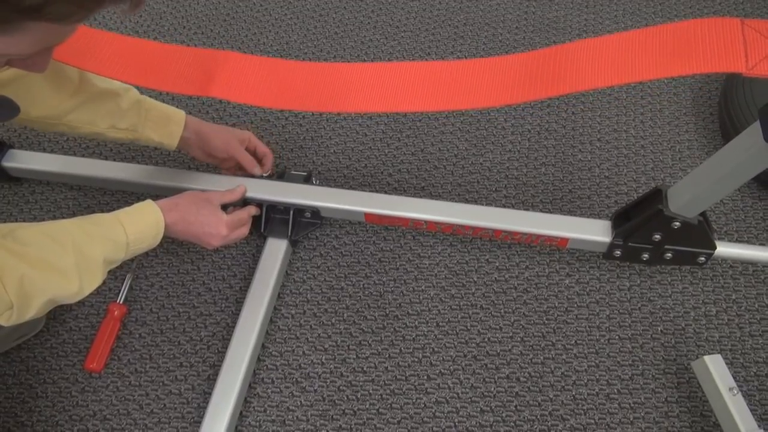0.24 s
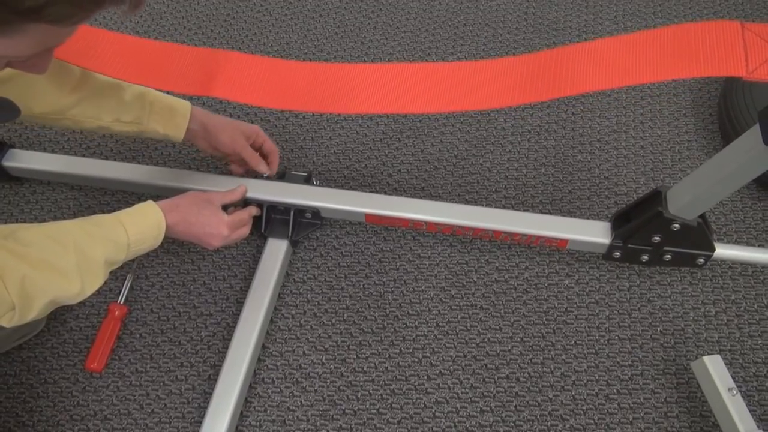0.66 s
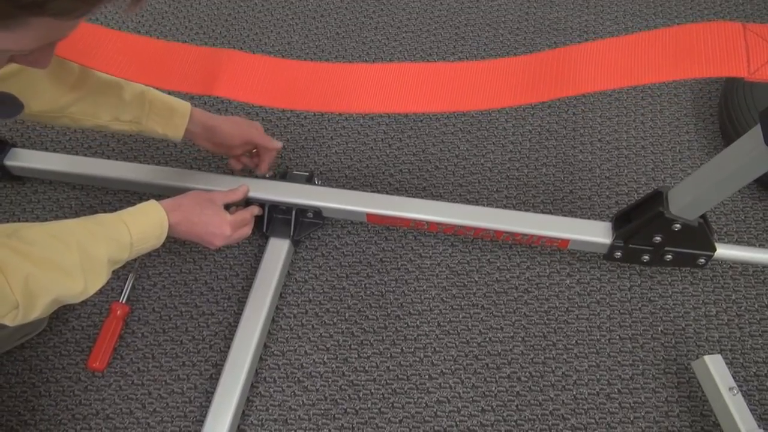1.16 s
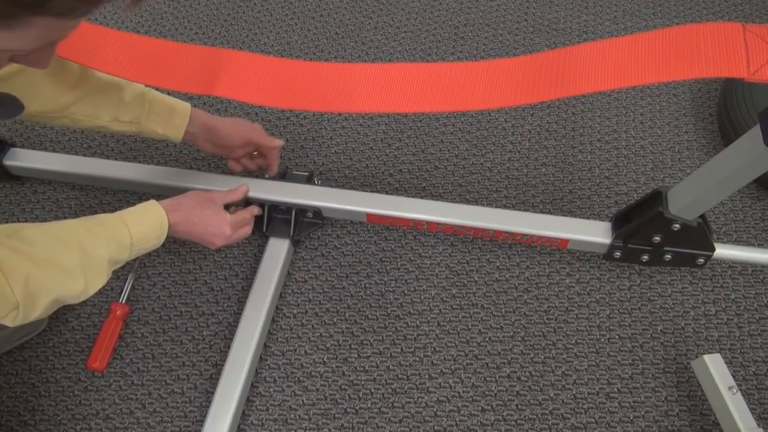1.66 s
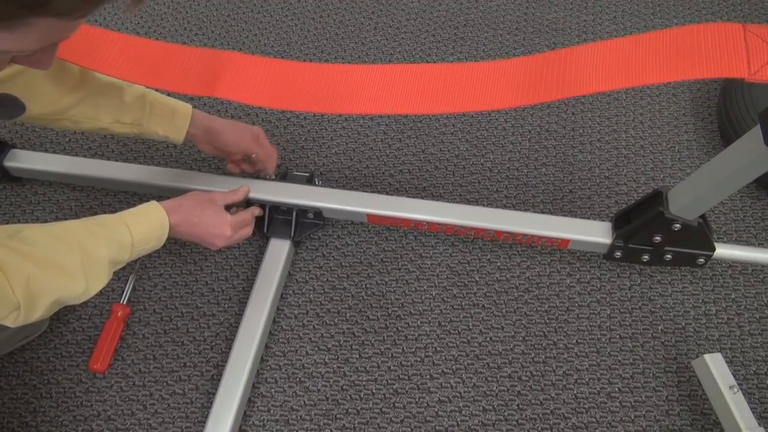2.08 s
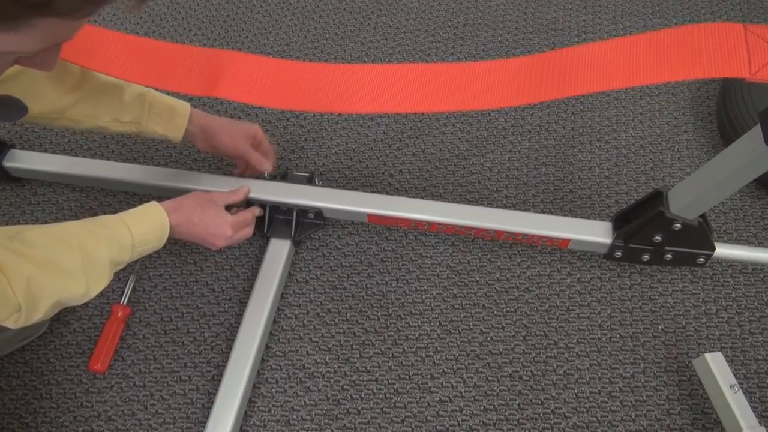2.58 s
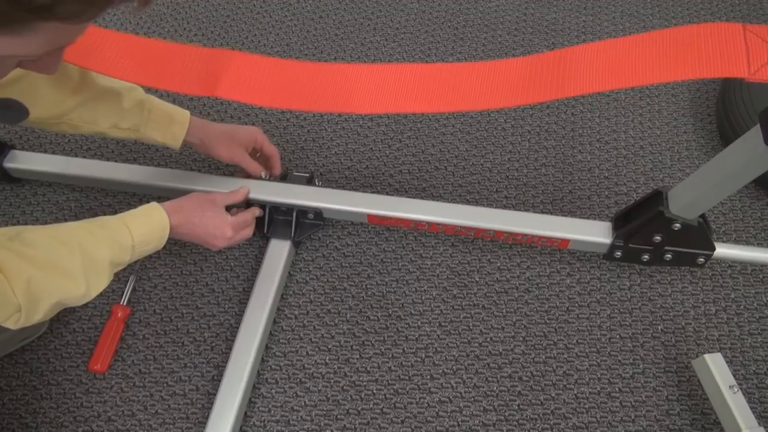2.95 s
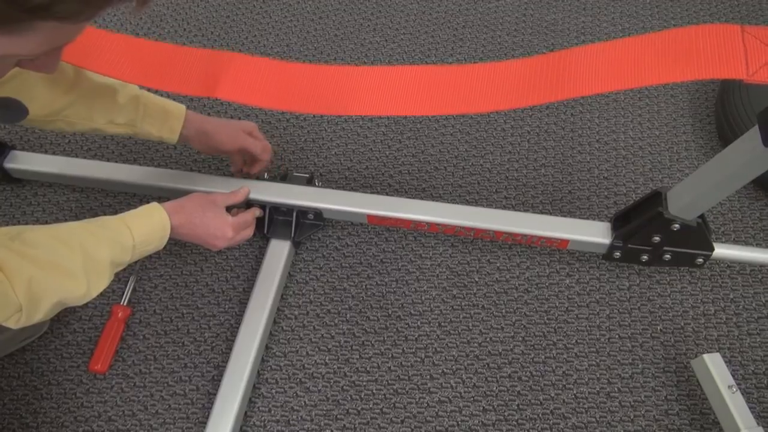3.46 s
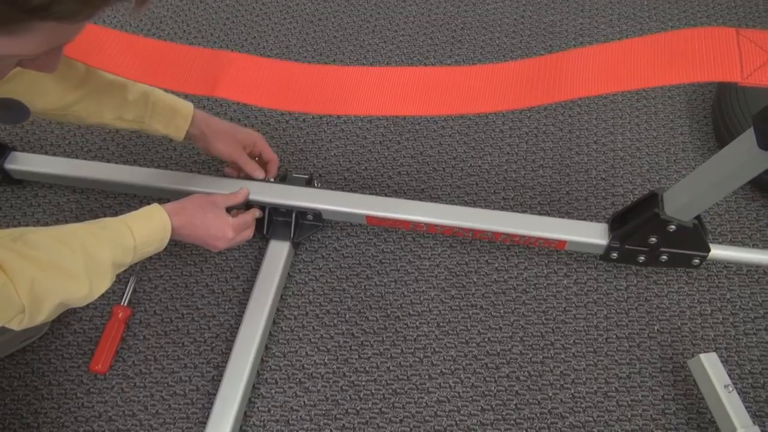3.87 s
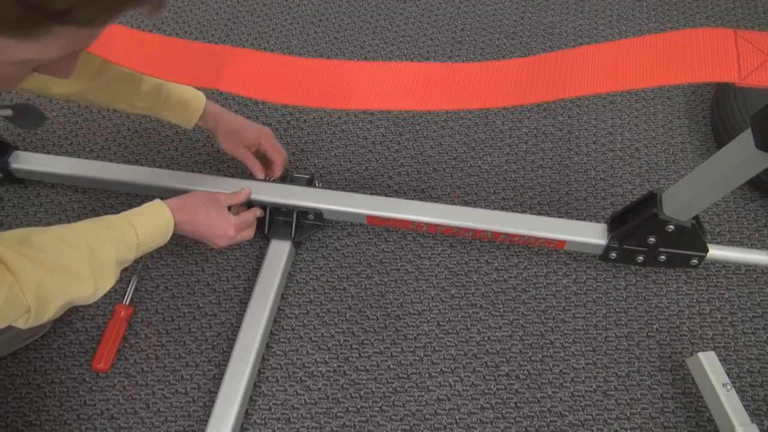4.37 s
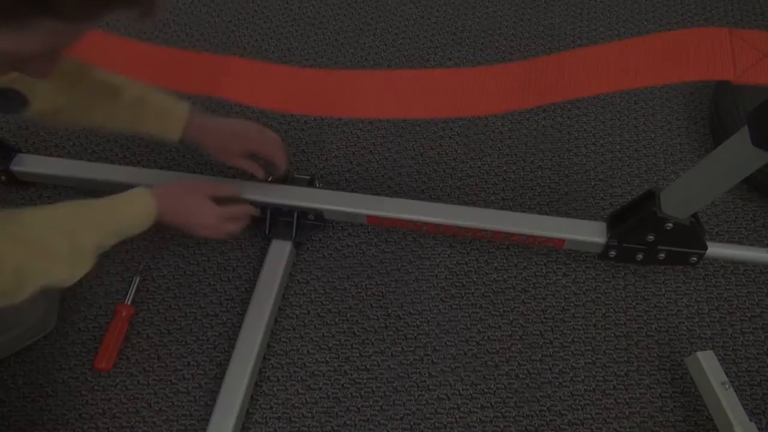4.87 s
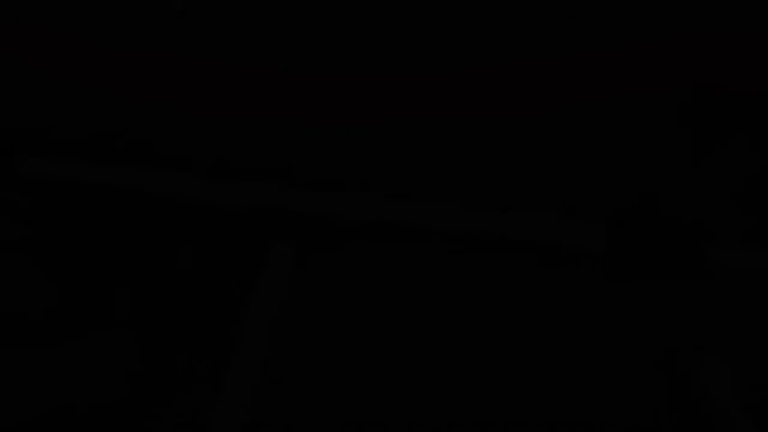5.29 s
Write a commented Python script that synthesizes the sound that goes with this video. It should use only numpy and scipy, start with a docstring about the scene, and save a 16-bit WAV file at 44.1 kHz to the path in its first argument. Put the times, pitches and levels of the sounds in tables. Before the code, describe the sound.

Small hardware rattles and rasps on a hollow metal tube in a quiet carpeted room, thinning to soft thuds and cloth brushing before a fade-out.

```python
"""Room tone and mains hum lie under a bolt wiggled through a bracket on an aluminium tube frame, and a wing nut turned on it.
From the first moments each contact is a brief chatter of metal: the harder, the brighter; the looser the fingers,
the more washer, nut and bolt clink. The thread scrapes in between, as random slips through the metal's resonances.
After 3.5 s the contacts thin out and sleeves brush as the hands leave; soft thuds run from 3 s on.
The last moments fade out. Both channels carry the same sound, with a short diffuse answer from the carpeted room."""
import sys
import numpy as np
from scipy import signal
from scipy.fft import rfft, irfft, next_fast_len
from scipy.io import wavfile
from scipy.ndimage import map_coordinates

SR = 44100
rng = np.random.default_rng(int(sys.argv[2]) if len(sys.argv) > 2 else 0)


def wrap_up_sound(samples):
    """Save the sound to the file named by the first command line argument, as 16-bit audio."""
    columns = np.atleast_2d(samples).T
    # keep every value between -1 and 1, then stretch to whole-number steps
    tamed = np.clip(columns, -1, 1)
    steps = np.round(tamed * 32767).astype(np.int16)
    wavfile.write(sys.argv[1], SR, steps)


N = 244314
TIME = np.arange(N) / SR  # seconds
HIT_SIZE = 4096  # samples in one burst of chatter
TOP_HZ = 16100  # nothing sounds above this

# Room tone. Each row: frequency in Hz, relative level in dB.
AIR = [(15, -5.5), (35, 2), (50, 3.5), (75, 6), (140, 1.5), (200, 3.5), (280, 0), (480, 1), (750, -4.5),
       (1700, -10.5), (5850, -16.5), (12400, -18.5), (16000, -26)]
# Mains and a fan. Each row: frequency in Hz, rms level in dB.
HUM = [(60, -53.5), (120, -67), (177, -59.5), (479, -65.5)]
# Reverberation of the room. Each row: frequency in Hz, time to fall 60 dB in seconds.
ROOM_DECAY = [(200, .35), (1000, .42), (3000, 0.38), (6000, 0.25), (13000, 0.33)]

# Cloth rubbing as the sleeves move. Each row: time in seconds, rms level in dB.
SLEEVE = [(3.5, -84), (3.754, -66), (4.314, -55), (4.488, -51), (4.71, -61.5), (5.034, -49.5), (5.214, -57),
          (5.4, -50)]
# Colour of the cloth. Each row: frequency in Hz, relative level in dB.
CLOTH = [(710, -30), (1200, 3.5), (1430, -5), (1770, 0), (4600, -1.5), (8350, -4), (10100, 1.5),
         (16000, -6.5)]
# Soft thuds of hands and knees. Each row: start in seconds, level in dB.
THUDS = [(3.021, -50), (3.438, -39), (3.974, -48), (5.24, -45.5), (5.281, -43.5), (5.306, -42)]
# Colour of a thud. Each row: frequency in Hz, relative level in dB.
THUD_COLOUR = [(150, -19), (300, -7), (420, 1.5), (600, 0.5), (900, -5.5), (1400, -14), (3000, -26.5)]

# Light grinding while the bolt is turned. Each row: time in seconds, force in dB.
TURNING = [(0, -101), (.15, -56.5), (.55, -67), (1.1, -52.5), (1.55, -62.5), (2, -69), (2.5, -66.5),
           (2.95, -57), (3.15, -77), (3.6, -72), (3.8, -61), (4.1, -66.5), (5.2, -72)]
# Finger strokes drag the thread across the edge of the hole. Each row: start in seconds, length in seconds, peak force in dB.
SCRAPES = [(0.12, 0.03, -44.5), (0.434, 0.055, -45.5), (0.96, 0.02, -35.5), (1.12, 0.094, -40),
           (1.28, 0.03, -46), (1.343, .03, -55.5), (1.547, 0.15, -44.5), (1.773, 0.088, -46.5),
           (1.893, 0.1, -48.5), (2.087, 0.034, -67.5), (2.168, .08, -44), (2.488, 0.094, -46.5),
           (2.684, 0.0098, -31.5), (2.701, 0.04, -44), (2.87, 0.15, -50), (3.34, 0.12, -34.5),
           (4.953, 0.077, -50.5)]
# The bolt meets the bracket. Each row: start in seconds, strength in dB, hardness from 0 (flat push) to 1 (steel edge),
# looseness from 0 (pinched) to 1 (free), rattle time in seconds.
CONTACTS = [(0.171, -34.5, 0.59, 0.78, .01), (0.298, -38, 0.32, 0.42, 0), (0.384, -32, 0.22, 0.55, 0),
            (0.43, -26, 0.74, 0.72, .01), (0.52, -36.5, 0.24, 0.2, 0), (0.577, -39, 0.014, 0.15, 0),
            (.639, -24, 0.77, 0.82, 0), (.709, -33, 0.42, 0.73, 0), (0.756, -27.5, 0.28, 0.32, 0),
            (.812, -24.5, 0.72, 0.68, .016), (.952, -38, .65, 0.72, .01), (1.025, -47.5, 0.43, .5, 0),
            (1.106, -35.5, 0.72, .6, 0), (1.172, -31, 0.82, 0.71, 0), (1.19, -35, 0.73, 0.44, 0),
            (1.295, -37, 0.73, 0.67, 0), (1.385, -33, 0.69, 0.46, 0), (1.416, -30.5, 0.35, .02, 0),
            (1.529, -26, 0.61, 0.83, .016), (1.593, -37.5, 0.74, 0.43, 0), (1.652, -36, .6, 0.38, 0),
            (1.757, -36, 0.71, .55, 0), (1.786, -40.5, .45, .75, 0), (1.82, -40, 0.54, 0.78, 0),
            (1.971, -38.5, 0.96, 0.21, 0), (2.053, -23, 0.57, 0.4, 0), (2.218, -43, 0.11, 0.72, 0),
            (2.361, -29.5, 0.78, 0.41, 0), (2.413, -21.5, .6, 0.48, 0), (2.4291, -28, .75, 0.98, 0),
            (2.472, -32.5, 0.68, 0.83, 0), (2.512, -33, 0.75, .75, 0), (2.69, -31, 0.31, 0.52, 0),
            (2.7882, -25, 0.63, 0.51, .01), (2.8638, -29, 0.38, .05, 0), (2.925, -29.5, 0.62, 0.34, 0),
            (2.946, -42.5, 0.35, 0.65, 0), (3.018, -31, 0.25, 0.54, 0), (3.14, -36.5, .5, 0.38, 0),
            (3.242, -55.5, .95, .02, 0), (3.302, -46.5, 0.56, 0.71, 0), (3.36, -28.5, 0.68, 0.34, .01),
            (3.377, -30, .7, 0.9, .03), (3.428, -35, 0.75, .6, 0), (3.435, -25.5, 0.74, 0.6, .01),
            (3.703, -42, 0.49, 0.75, 0), (3.744, -45.5, 0.27, 0.29, 0), (4.398, -46, 1, .02, 0),
            (4.483, -37.5, 0.81, .02, 0), (4.962, -44, .85, .1, 0), (4.987, -51, 0.16, .3, 0)]

# Low resonances of the frame. Each row: frequency in Hz, half width in Hz, relative level in dB.
KNOCK = [(448, 25, -26.5), (618, 59, -2), (793.5, 21, 5), (970, 140, -2), (1204, 124, 6), (1547, 23, 3.5)]
# Resonances of the bracket. Each row: frequency in Hz, half width in Hz, relative level in dB.
BRACKET = [(1544, 142, 4.5), (1763, 54, -6), (2038, 100, 4.5), (2357, 170, 0), (2684, 180, 0.5),
           (3080, 49, 5.5), (3455, 94, 1.5), (3920, 290, -2), (4206, 220, 0.5), (4646, 90, 1.5),
           (5120, 66, 7), (5390, 140, -2.5), (5800, 42, -17.5), (5816, 180, 2), (6150, 89, -3.5),
           (6300, 110, -8.5)]
# Colour of steel on steel. Each row: frequency in Hz, relative level in dB.
TICK = [(4500, -25.5), (6500, 7), (8000, 4), (10500, 4.5), (11700, 4), (12500, 4.5), (13800, 11.5),
        (14600, -3), (16000, -13)]
# Lasting modes of the hollow tube. Each row: frequency in Hz, relative level in dB, time to fall 60 dB in seconds.
TUBE = [(605, 4.5, 0.34), (785, -10, 0.31), (1098, 6, 0.18), (1219, 3.5, 0.31), (1441, 11.5, 0.14),
        (1580, -7.5, 0.17), (1758, 4.5, 0.27), (1935, 9, 0.18), (2596, -9, 0.15), (3060, -5.5, 0.15),
        (3300, -13, 0.13)]
# Modes of the washer, the nut and the bolt. Each row: frequency in Hz, relative level in dB, time to fall 60 dB in seconds.
WASHER = [(4010, 0, .27), (4120, -11, .13), (5765, -17, .18), (5940, -20, .2), (6150, -21, .18)]
NUT = [(12350, -16, .06), (12615, -14, .14), (12675, -7, .14), (12890, -13, .08), (13710, -5, .085),
       (13950, -16, .05)]
BOLT = [(1935, -11, .5), (2907, -14, .5), (4231, -3, .25), (4412, -7, .25), (5180, -4, .38),
        (5420, -10, .3), (5700, -10, .3)]

REBOUND_S, REBOUND_LOSS_DB = .007, 2  # a rattling part strikes again and again, weaker each time
# harder contacts knock less and tick more: (dB when flat, dB on an edge)
KNOCK_DB, CLACK_DB, TICK_DB = (5, -21.5), (0, 0.5), (-23.5, 1)
# a flat push lasts longer and is duller: (Hz when flat, Hz on an edge)
KNOCK_CORNER_HZ, CLACK_CORNER_HZ = (450, 4020), (2200, 20300)
# the fingers damp the steel parts: (dB when pinched, dB when free); the nut's ting is counted from the tick
WASHER_DB, NUT_DB, BOLT_DB = (-29, 4.5), (-23, 14.5), (-38.5, -6.5)
TUBE_DB = -22.5  # the hands damp the tube, so its ring stays far under the blows
STICK_DB, STICKS_PER_S = 8, 130  # depth and pace of the stick-slip
SLIDE_S, SLIDE_DB = 0.0046, -19.5  # the bolt slides briefly into each contact, this far under the blow
CATCH_DB, CATCH_SPREAD_DB = 3.5, 6  # ridges catch at random, typically this far above the scraping
CATCH_HARDNESS, CATCH_LOOSENESS = 0.51, 0.61
FADE_END_S, FADE_S, FADED_DB = 5.477, 0.3, -30.5  # the closing fade and the level it sinks to


def amp(db):
    """Decibels to gain."""
    return 10 ** (np.asarray(db) / 20)


def unit(x):
    """Scale to rms 1."""
    return x / np.sqrt(np.mean(x ** 2) + 1e-20)


def fall(t, t60):
    """Free decay of a vibration, 60 dB in t60 seconds."""
    return np.exp(-np.log(1000) * t / t60)


def along(points, hz):
    """Read (Hz, value) points on a log frequency axis."""
    f, v = np.transpose(points)
    return np.interp(np.log(hz + 1), np.log(f + 1), v)


def between(ends, share):
    """A value on the straight line between its two extremes."""
    return ends[0] + (ends[1] - ends[0]) * np.clip(share, 0, 1)


def level(rows):
    """Gain per sample from (s, dB) rows."""
    return amp(np.interp(TIME, *np.transpose(rows)))


def wobble(rate):
    """A smooth random curve, rate knots a second."""
    knots = rng.standard_normal(int(N * rate / SR) + 4)
    return map_coordinates(knots, [TIME * rate / SR])


def add(track, s, sound):
    """Mix a sound into a track at time s."""
    part = track[round(s * SR):][:len(sound)]
    part += sound[:len(part)]


def coloured(x, spectrum):
    """A steady sound shaped by a spectrum, at rms 1."""
    size = next_fast_len(N + HIT_SIZE)
    gain = amp(along(spectrum, np.fft.rfftfreq(size, 1 / SR)))
    return unit(irfft(rfft(x, size) * gain, size)[:N])


def causal(spectrum):
    """Minimum-phase response: nothing sounds before the blow."""
    gain = amp(along(spectrum, np.fft.rfftfreq(HIT_SIZE, 1 / SR)))
    cepstrum = irfft(np.log(gain))
    cepstrum[1:HIT_SIZE // 2] *= 2
    cepstrum[HIT_SIZE // 2 + 1:] = 0
    return np.exp(rfft(cepstrum))


def resonant(modes):
    """The (Hz, dB) spectrum of a set of resonances."""
    hz = np.fft.rfftfreq(HIT_SIZE, 1 / SR)
    centre, width, db = np.transpose(modes)[:, :, None]
    peaks = amp(db) / (1 + ((hz - centre) / width) ** 2)
    return np.c_[hz, 20 * np.log10(np.sum(peaks, axis=0))]


def friction(spectrum, slip_rate):
    """Rubbing at rms 1: tiny random slips, about slip_rate a second, each one exciting the same resonances."""
    slips = (rng.random(N) < slip_rate / SR) * rng.standard_normal(N)
    return unit(signal.oaconvolve(slips, irfft(causal(spectrum)))[:N])


def chatter(starts, levels_db, spectrum, t60, spiky_db, rise, corner_hz=np.inf):
    """Every contact is a dying burst of uneven micro-impacts, coloured by the dense modes of what is struck."""
    t = np.arange(HIT_SIZE) / SR
    chance = rng.standard_normal((len(starts), 2, HIT_SIZE))
    envelope = fall(t, t60) * (1 - np.exp(-t / rise))
    impacts = chance[:, 0] * amp(spiky_db * chance[:, 1]) * envelope
    # a two-stage low-pass dulls the softer contacts
    softness = (1 + 1j * (np.fft.rfftfreq(HIT_SIZE, 1 / SR) / np.reshape(corner_hz, (-1, 1)))) ** -2
    bursts = irfft(rfft(impacts) * causal(spectrum) * softness)
    attack = t < .008  # each burst is levelled by its first 8 ms
    track = np.zeros(N)
    for s, db, burst in zip(starts, levels_db, bursts):
        add(track, s, amp(db) * burst / burst[attack].std())
    return track


def clink(starts, levels_db, modes, scatter_db, choke_t60, detune):
    """A loose steel part rings from each contact until the next one stops it."""
    t = np.arange(SR // 3) / SR
    hz, db, t60 = np.transpose(modes)[:, :, None]
    decay = np.sqrt(2) * amp(db) * fall(t, t60)
    free_times = np.diff(starts, append=TIME[-1])
    track = np.zeros(N)
    for s, free, hit_db in zip(starts, free_times, levels_db):
        strength, side, load = rng.standard_normal((3, len(modes), 1))
        # where it is struck sets each mode's strength; how it rests shifts the pitch a little
        push = np.sign(side) * amp(scatter_db * strength)
        swing = push * np.sin(2 * np.pi * hz * (1 + detune * load) * t)
        choke = fall(np.maximum(t - free, 0), choke_t60)
        add(track, s, amp(hit_db) * np.sum(decay * swing, axis=0) * choke)
    return track


def background(air_db, drift):
    """Room tone as shaped noise, with hum lines whose phase wanders slightly."""
    hum = sum(np.sqrt(2) * amp(db) * np.sin(2 * np.pi * hz * TIME + drift * wobble(4)) for hz, db in HUM)
    return hum + amp(air_db) * coloured(rng.standard_normal(N), AIR)


def room(x, build_up):
    """The walls answer with a short diffuse tail that builds up, then decays at its own pace in each band."""
    hz, t, z = signal.stft(rng.standard_normal(SR // 2), SR, nperseg=256)
    tail = signal.istft(z * fall(t, along(ROOM_DECAY, hz)[:, None]), SR, nperseg=256)[1]
    tail *= 1 - np.exp(-(np.arange(len(tail)) / SR / build_up) ** 2)
    return signal.fftconvolve(x, tail / np.linalg.norm(tail))[:N]


def sleeves():
    """Cloth brushes as many tiny slips, swelling and sinking with the movement of the arms."""
    return level(SLEEVE) * friction(CLOTH, slip_rate=4000)


def soft_thuds():
    """Hands and knees land softly: low bursts with little spikiness."""
    return chatter(*np.transpose(THUDS), THUD_COLOUR, t60=0.12, spiky_db=1.5, rise=0.0011)


def drag():
    """Force on the thread: light turning, a rounded swell for each finger stroke, a short slide into each contact."""
    force = level(TURNING)
    slides = [(s - SLIDE_S, SLIDE_S, db + SLIDE_DB) for s, db, *_ in CONTACTS]
    for s, length, db in SCRAPES + slides:
        add(force, s, amp(db) * np.sqrt(np.hanning(round(length * SR))))
    return force


def thread(force):
    """The bolt's ridges stick and slip, rasping through the bracket and the nut."""
    rasp = friction(resonant(BRACKET), slip_rate=2500)
    body = amp(-12) * friction(resonant(KNOCK), slip_rate=1500)
    grit = amp(-18) * friction(TICK, slip_rate=6100)
    stick_slip = unit(amp(STICK_DB * wobble(STICKS_PER_S)))
    return force * stick_slip * (rasp + body + grit)


def catches(force, count):
    """Ridges of the thread catch at random moments, harder on average where it is dragged harder."""
    starts = np.sort(rng.uniform(0, TIME[-1], count))
    drag_db = 20 * np.log10(np.interp(starts, TIME, force))
    db = drag_db + CATCH_DB + CATCH_SPREAD_DB * rng.standard_normal(count)
    return starts, db, CATCH_HARDNESS, CATCH_LOOSENESS


def contacts():
    """Every contact with its rebounds, as columns: s, dB, hardness, looseness."""
    hits = []
    for s, db, hard, loose, rattle in CONTACTS:
        for k in range(1 + int(abs(rattle) / REBOUND_S)):
            hits.append((s + k * REBOUND_S, db - k * REBOUND_LOSS_DB, hard, loose))
    return np.transpose(hits)


def tube(blows):
    """The hollow aluminium tube sings on at its few lasting modes."""
    t = np.arange(SR // 2) / SR
    ring = sum(amp(db) * fall(t, t60) * np.sin(2 * np.pi * hz * t) for hz, db, t60 in TUBE)
    return signal.fftconvolve(blows, ring / np.linalg.norm(ring))[:N]


def strike(starts, db, hard, loose):
    """Hardness shares each blow among frame, bracket and steel edge; looseness lets washer, nut and bolt ring."""
    tick_db = db + between(TICK_DB, hard)
    knocks = chatter(starts, db + between(KNOCK_DB, hard), resonant(KNOCK), t60=0.058, spiky_db=0.5, rise=0.00024,
                     corner_hz=np.exp(between(np.log(KNOCK_CORNER_HZ), hard)))
    clacks = chatter(starts, db + between(CLACK_DB, hard), resonant(BRACKET), t60=0.04, spiky_db=6, rise=0.00064,
                     corner_hz=np.exp(between(np.log(CLACK_CORNER_HZ), hard)))
    ticks = chatter(starts, tick_db, TICK, t60=0.037, spiky_db=6.5, rise=.0005)
    washer = clink(starts, db + between(WASHER_DB, loose), WASHER, scatter_db=-0.5, choke_t60=0.018, detune=0.00071)
    nut = clink(starts, tick_db + between(NUT_DB, loose), NUT, scatter_db=2.5, choke_t60=.016, detune=0.00068)
    bolt = clink(starts, db + between(BOLT_DB, loose), BOLT, scatter_db=3, choke_t60=0.12, detune=0.0015)
    return np.array([knocks + clacks, ticks, washer + nut + bolt])


def scene():
    """Frame, hardware and hands, heard at one spot in the room."""
    floor = background(air_db=-55, drift=.1)  # drift in radians
    sleeve = sleeves()
    thuds = soft_thuds()
    force = drag()
    rasp = thread(force)
    blows, ticks, steel = strike(*catches(force, count=130)) + strike(*contacts())
    frame = blows + rasp + amp(TUBE_DB) * tube(blows + rasp)
    to_walls = amp(-9.5) * (frame + thuds) + amp(-13) * ticks + amp(-14.5) * steel
    walls = room(to_walls, build_up=0.0042)
    mono = frame + ticks + steel + thuds + sleeve + walls + floor
    return np.array([mono, mono])


def record(dry):
    """A fade at the end, and nothing above the band limit."""
    fade = np.clip((FADE_END_S - TIME) / FADE_S, amp(FADED_DB), 1)
    size = next_fast_len(N + HIT_SIZE)
    in_band = np.fft.rfftfreq(size, 1 / SR) < TOP_HZ
    return irfft(rfft(dry * fade, size) * in_band, size)[:, :N]


dry = scene()
out = record(dry)
wrap_up_sound(out)
```